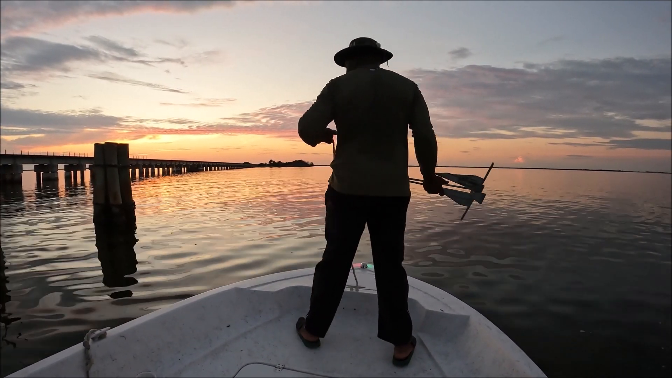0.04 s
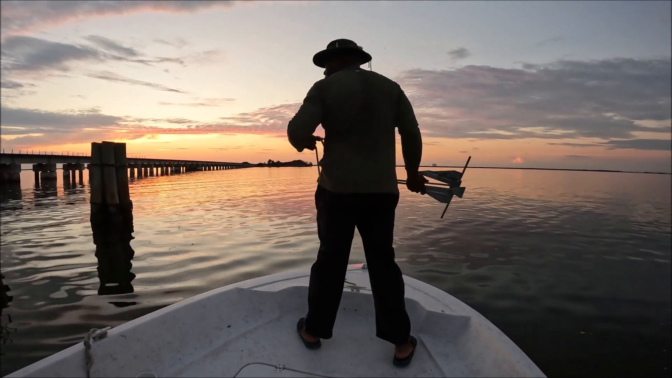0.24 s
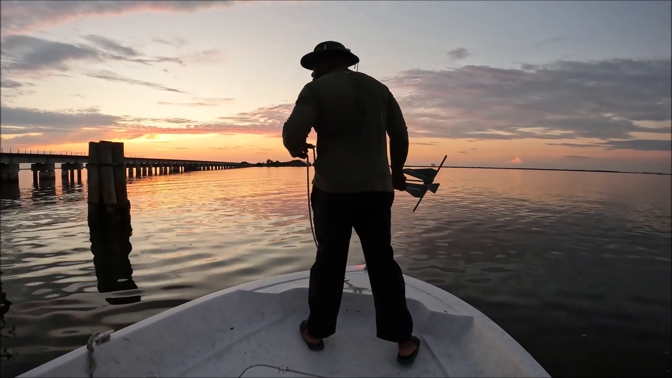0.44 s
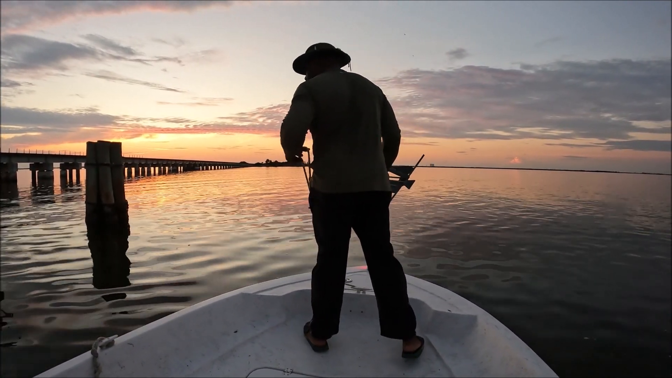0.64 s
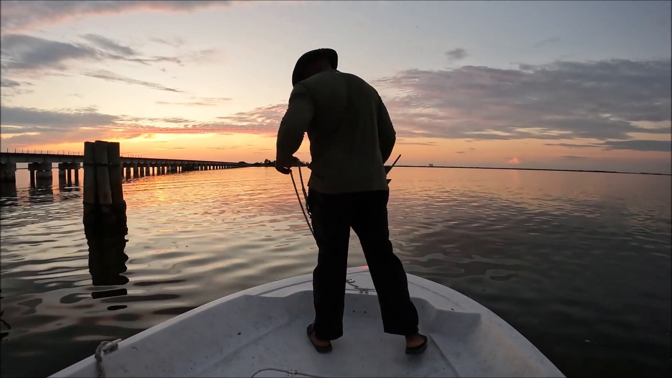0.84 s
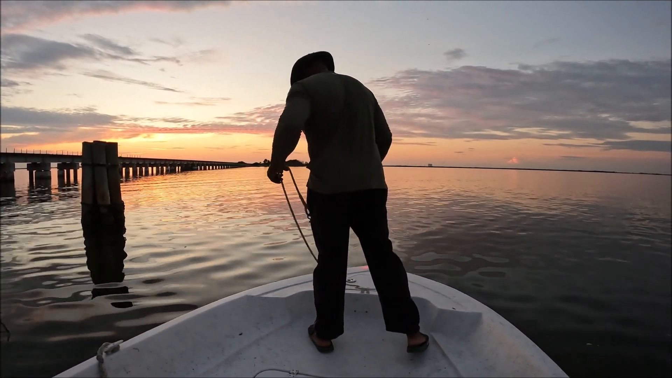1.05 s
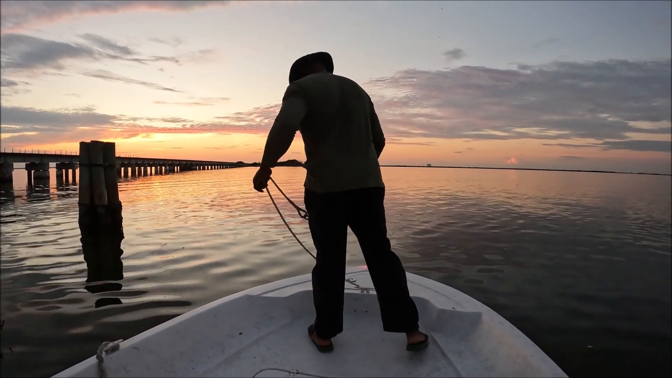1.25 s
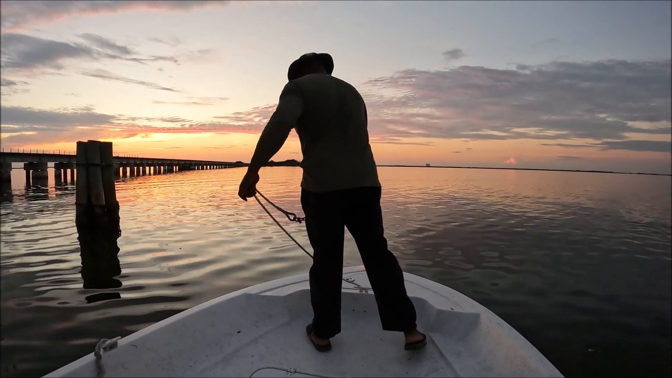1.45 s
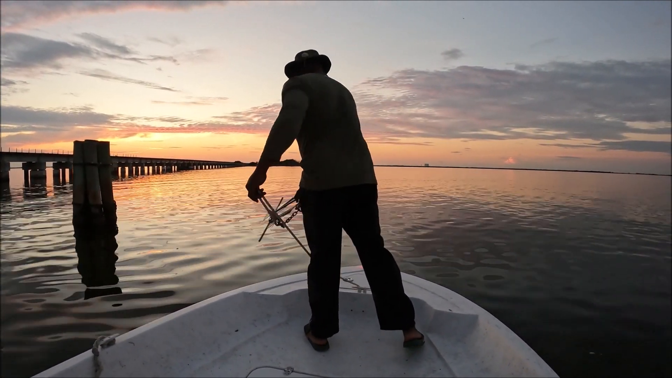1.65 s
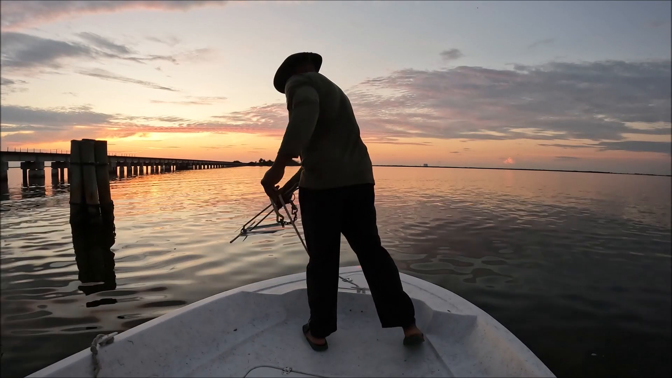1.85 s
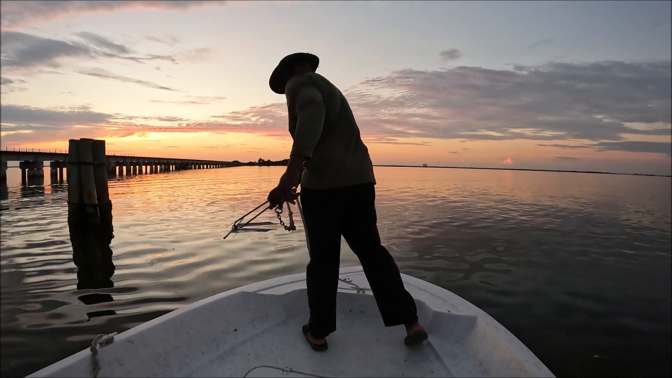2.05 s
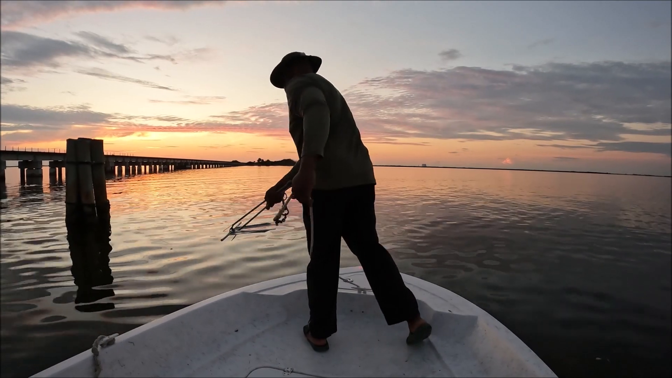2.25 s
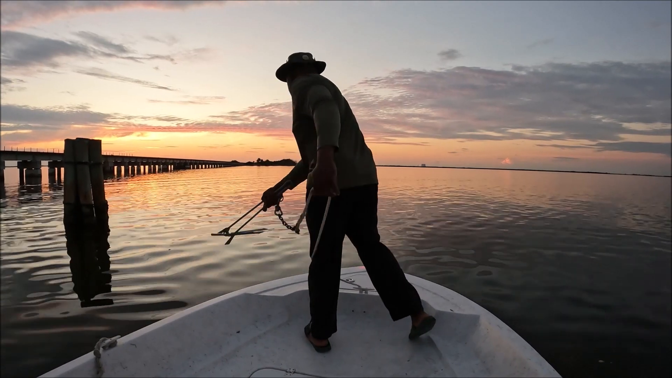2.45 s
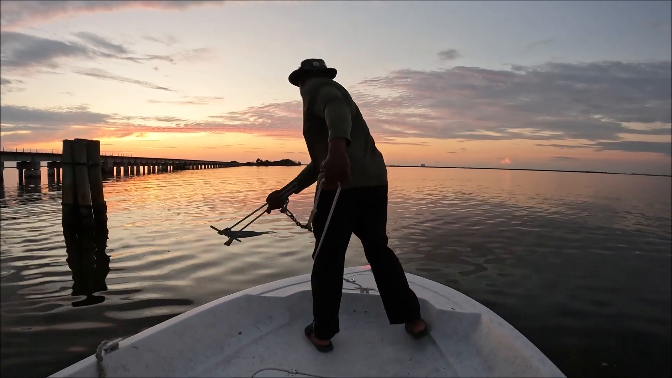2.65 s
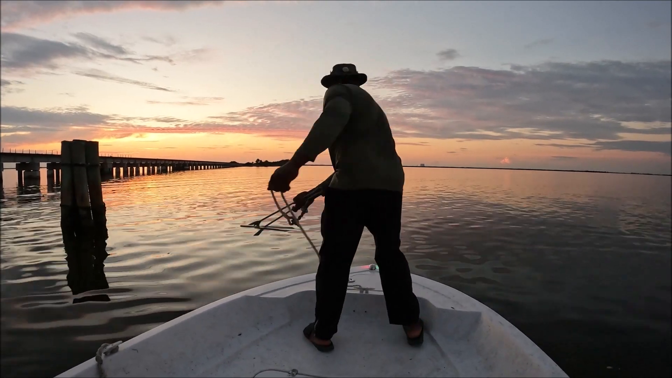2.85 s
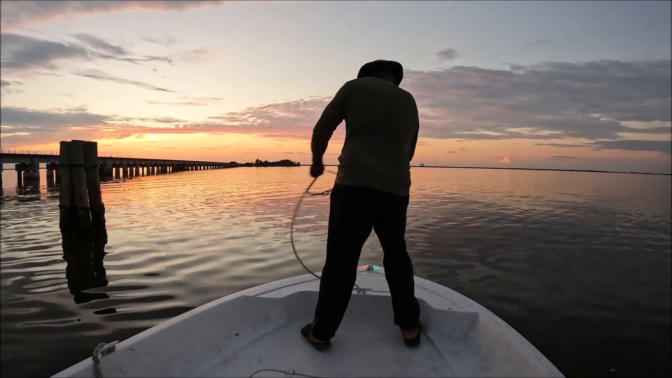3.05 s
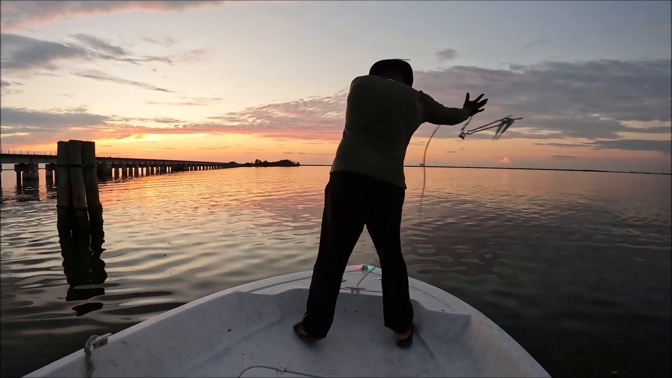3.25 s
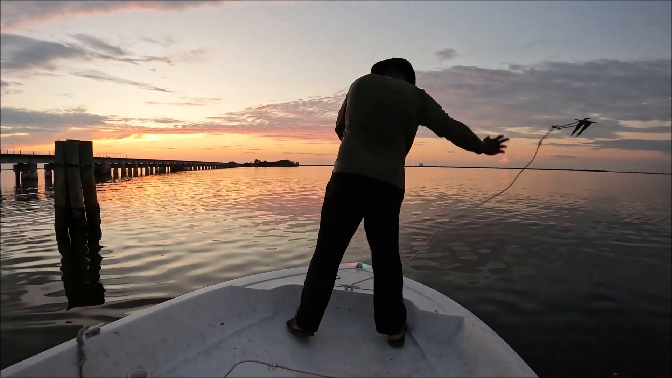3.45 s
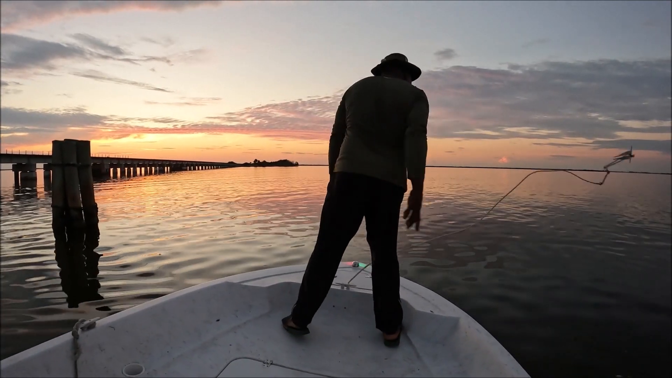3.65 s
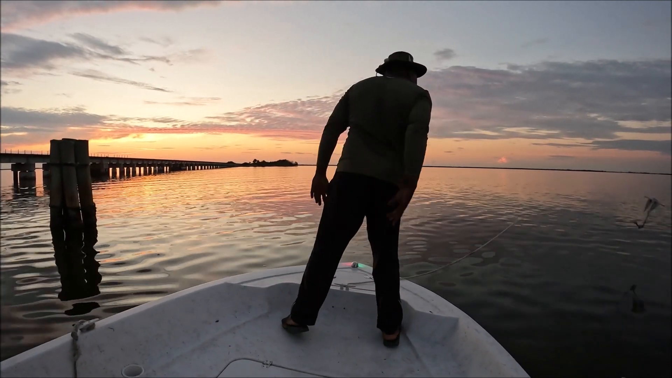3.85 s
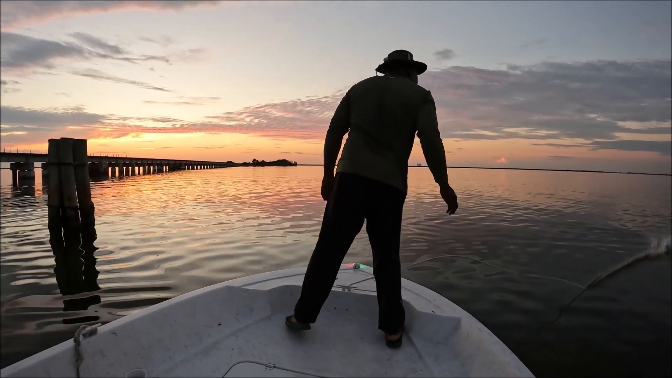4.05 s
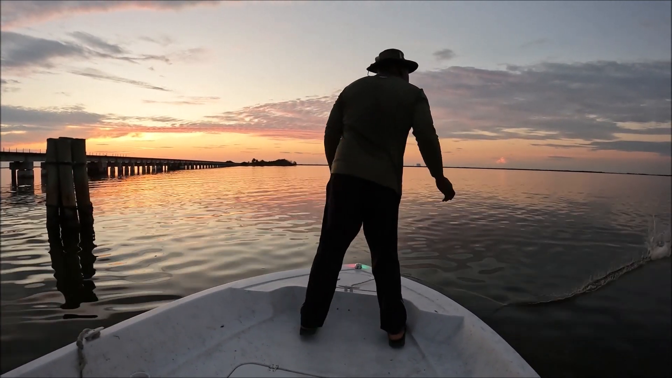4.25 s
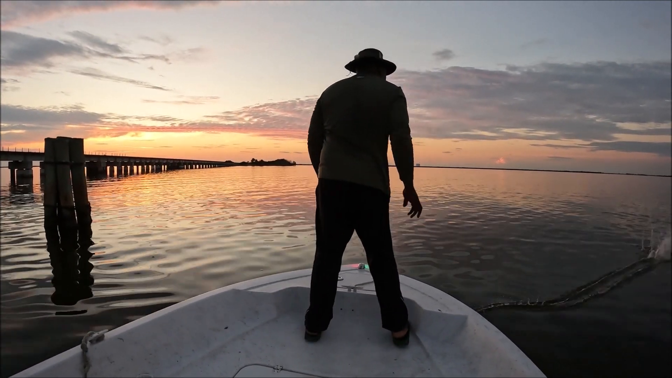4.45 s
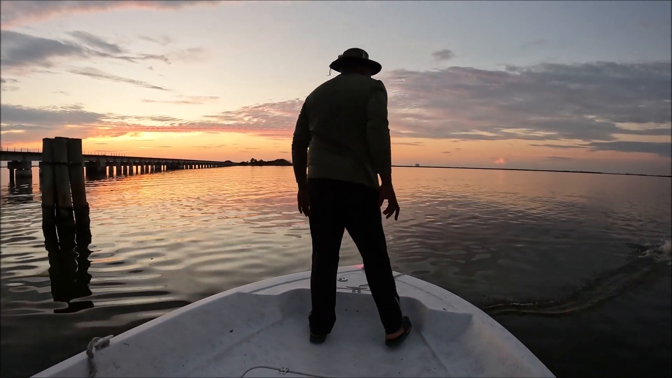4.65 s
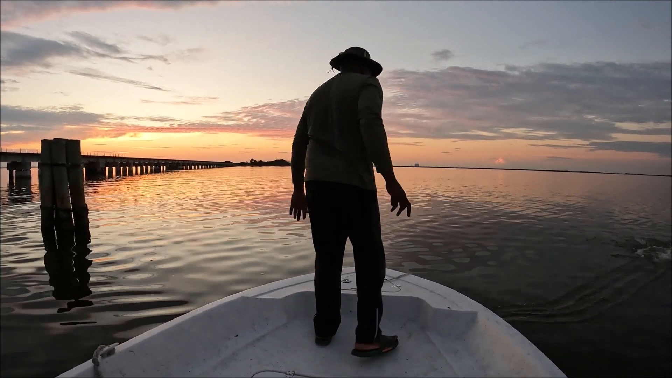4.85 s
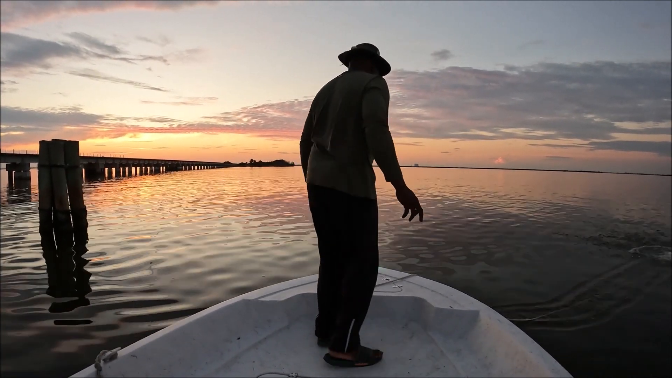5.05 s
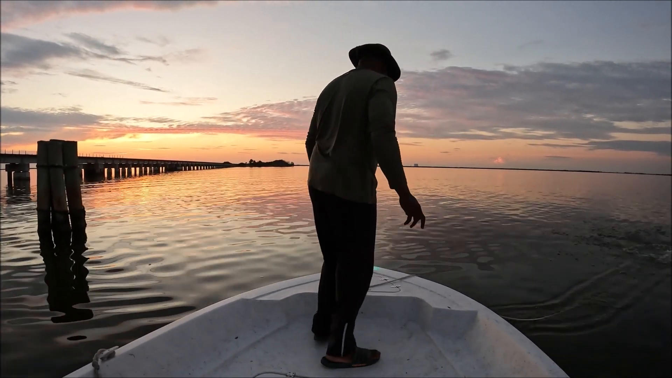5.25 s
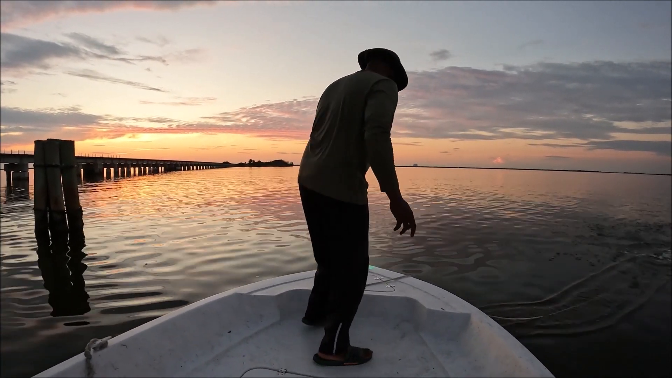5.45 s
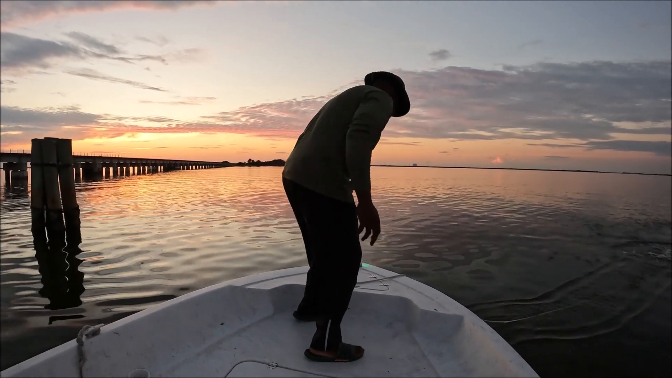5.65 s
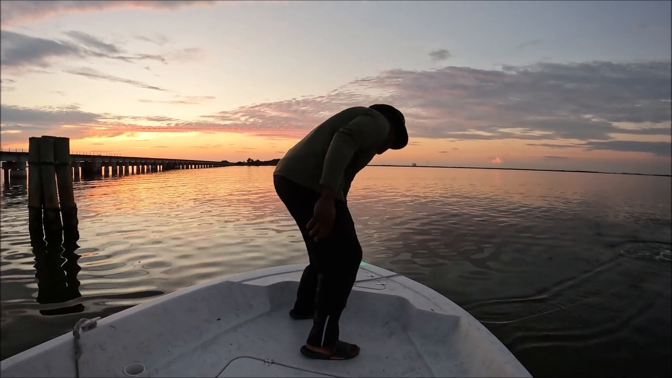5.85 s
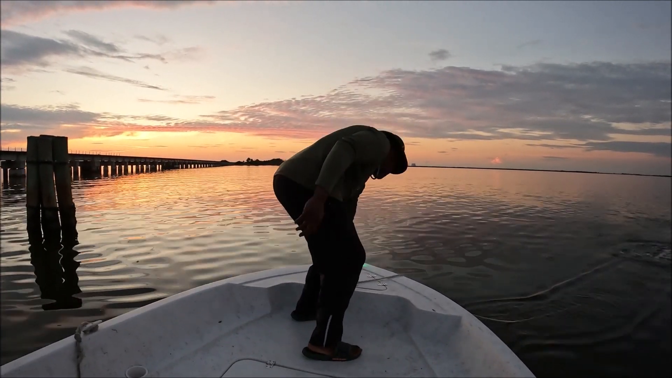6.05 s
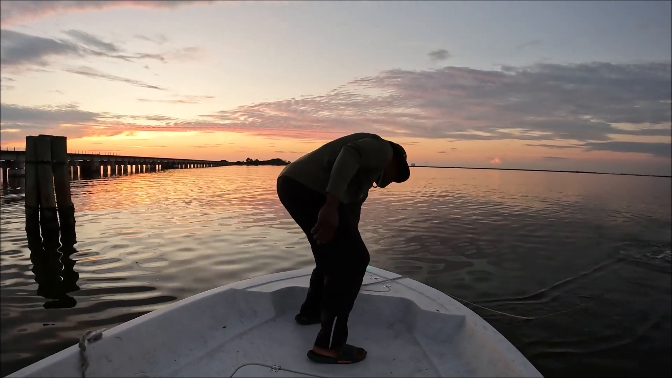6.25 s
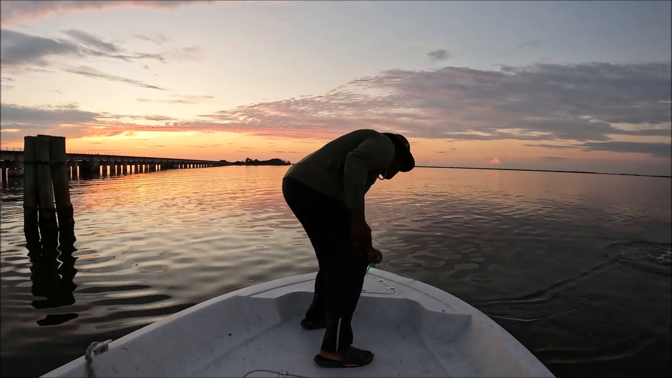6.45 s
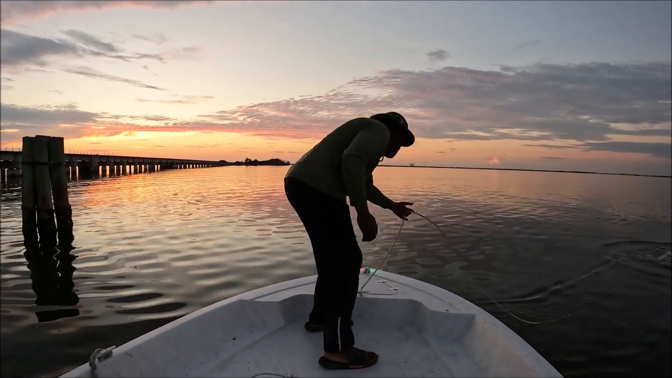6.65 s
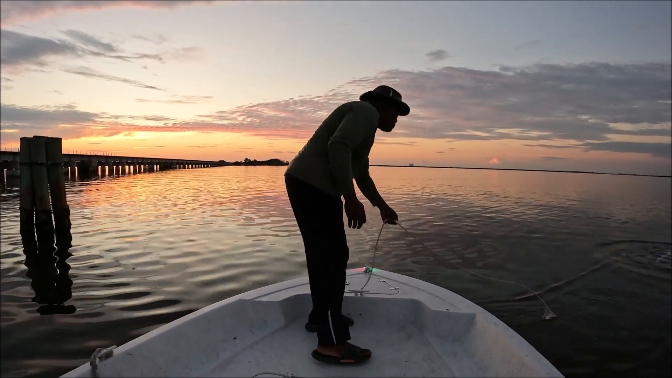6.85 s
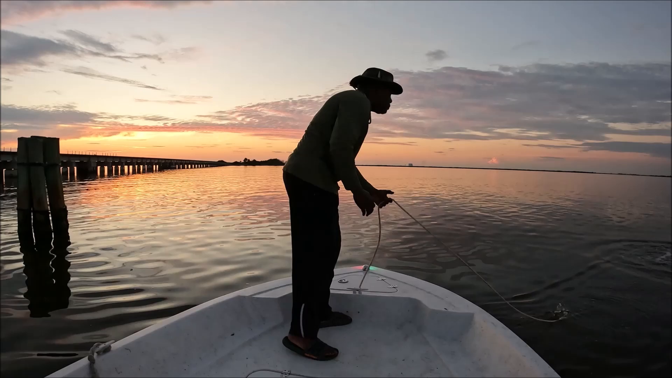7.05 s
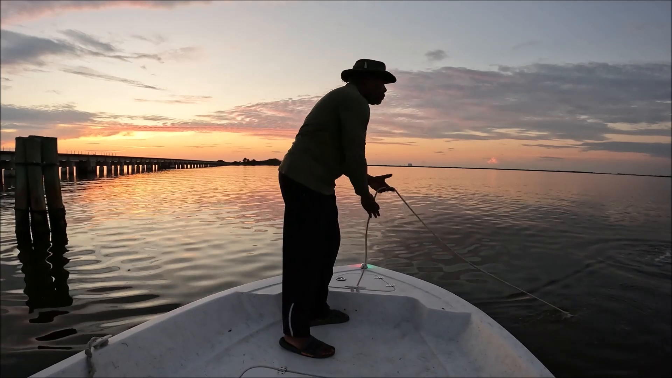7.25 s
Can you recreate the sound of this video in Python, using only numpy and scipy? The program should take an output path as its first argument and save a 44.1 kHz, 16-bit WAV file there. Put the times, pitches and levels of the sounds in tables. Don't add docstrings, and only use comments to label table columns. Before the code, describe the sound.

Throughout, a small boat's idling motor hums low through the hull, over soft rumble and faint wide airy hiss. Dull line ticks open it; at 0.3 and 0.5 seconds a distant crow caws twice, the second lower, with a soft step between. From about 1.8 to 2.2 the iron anchor flukes clank hard against the shank, ringing until choked off by a hand. A few ticks follow, then at 3.2 to 3.5 chain rattles out in a bright, dense burst with hard knocks. Slack line drums hollowly on the hull until 4.4 while the anchor jangles in flight. At 4.2 it plunges with a sharp loud splash, bubbles and churn; spray patters back, thinning by 5.5 with a small slosh. Hollow footsteps thump between 5.1 and 6.7, the strongest near 6.7. From 6.9 to the end at 7.3, the lifted wet line sheds small trickling gushes. Close, dry, outdoor stereo.

```python
import sys
import numpy as np
from scipy import signal
from scipy.fft import rfft, irfft
from scipy.io import wavfile
from scipy.ndimage import uniform_filter1d

SR = 44100
rng = np.random.default_rng(int(sys.argv[2]) if len(sys.argv) > 2 else 0)


def magnitude_from_level(level_db):
    exponent = np.asarray(level_db, float) / 20
    return 10 ** exponent


def int16_out(signal):
    q = np.round(np.clip(np.atleast_2d(signal).T, -1, 1) * 32767)
    wavfile.write(sys.argv[1], SR, q.astype(np.int16))


N = 322371


def rms_one(x):
    return x / np.sqrt(np.mean(x ** 2) + 1e-20)


def in_time(rows):
    s, *columns = np.transpose(rows)
    return [np.interp(np.arange(N) / SR, s, c) for c in columns]


def span(begin_s, end_s, fade_s):
    t = np.arange(N) / SR
    return np.clip(np.minimum(t - begin_s, end_s - t) / fade_s, 0, 1)


def drift(rate):
    r = np.exp(-80 * np.pi * rate / SR)
    slow = signal.lfilter([1], [1, -2 * r, r * r], rng.standard_normal(N // 40 + 2002))[2000:]
    return np.interp(np.arange(N) / 40, np.arange(len(slow)), rms_one(slow))


def coloured(x, spectrum):
    hz, db = np.transpose(spectrum)
    grid = np.maximum(np.fft.rfftfreq(x.shape[-1], 1 / SR), 1)
    gain = magnitude_from_level(np.interp(np.log(grid), np.log(hz), db))
    return rms_one(irfft(rfft(x) * gain, x.shape[-1]))


def band(x, low_hz, high_hz):
    sos = signal.butter(2, [low_hz, min(high_hz, .45 * SR)], "band", fs=SR, output="sos")
    return signal.sosfilt(sos, x)


def resonance(x, hz, width_hz):
    r = np.exp(-np.pi * width_hz / SR)
    poles = [1, -2 * r * np.cos(2 * np.pi * hz / SR), r * r]
    return signal.lfilter(np.array([1, 0, -1]) * (1 - r * r) / 2, poles, x)


def wide(noise, side_db):
    return noise[0] + magnitude_from_level(side_db) * noise[1] * [[1], [-1]]


def add(out, s, sound, pan_db=0):
    i = min(round(s * SR), N - 1)
    out[:, i:i + sound.shape[-1]] += (sound * magnitude_from_level([[pan_db / 2], [-pan_db / 2]]))[:, :N - i]


def decay(t, t60, rise_s):
    return (1 - np.exp(-t / rise_s)) * magnitude_from_level(-60 * t / t60)


# pitch_hz, level_db (per Hz)
HULL_RUMBLE = [(8, -6.5), (15, 2), (24, -4), (38, -18.5), (68, -0.5), (95, -8.5), (200, -20.5), (350, -34),
               (500, -37.5), (700, -46), (4000, -100)]
# time_s, level_db
ROCKING = [(0, -34), (1.5, -35.5), (2.7, -33.5), (3.5, -32), (4.5, -35), (5.6, -32), (7.31, -35)]
# pitch_hz, level_db (per Hz)
FAR_HISS = [(260, -1), (450, -6), (774, -18), (1290, -5.5), (1810, -15), (2860, -17.5), (4310, -24.5),
            (6690, -22.5), (12600, -36.5), (13800, -57)]


def background():
    rocking_db, = in_time(ROCKING)
    low = wide(coloured(rng.standard_normal((2, N)), HULL_RUMBLE), -22)
    far = wide(coloured(rng.standard_normal((2, N)), FAR_HISS), -1.2)
    low_db = rocking_db + 2.5 + 1.22 * drift(9.0)
    far_db = -56 + 2.0 * drift(19.0) + 0.5 * (rocking_db - rocking_db.mean())
    return magnitude_from_level(low_db) * low + magnitude_from_level(far_db) * far


# time_s, firing_rate_hz
IDLE = [(0, 32.14), (4.4, 32.04), (7.31, 32.61)]
# multiple of the firing rate, level_db (rms)
MOTOR_LINES = [(2, -44), (3, -47), (4, -45), (5, -45), (6, -44), (7, -50), (8, -59), (9, -53), (10, -57),
               (11, -57), (12, -68)]
# time_s, level_db
HULL_LOAD = [(0, -5), (1.5, -1), (4.8, 0), (5.8, -8.5), (7.31, -4.5)]


def motor():
    firing_hz = in_time(IDLE)[0] * (1 + .0015 * drift(1.5))
    phase = 2 * np.pi * np.cumsum(firing_hz) / SR
    lines = np.zeros(N)
    for multiple, db in MOTOR_LINES:
        lines += magnitude_from_level(db + 1.5 * drift(2)) * np.sin(multiple * phase + rng.uniform(0, 7))
    return np.sqrt(2) * magnitude_from_level(in_time(HULL_LOAD)[0]) * lines


# pitch_hz, width_hz, level_db
THROAT = [(1510, 330, 7.5), (4360, 280, -12.5), (5670, 1160, -14.5), (6440, 550, -16)]


def caw(rows):
    pitch_hz, level_db, hoarse = in_time(rows)
    cycles = np.cumsum(pitch_hz * (1 + 0.01 * drift(89))) / SR
    breath = hoarse * rng.standard_normal(N) * (cycles % 1 < .5)
    pulses = np.diff(np.floor(cycles), prepend=0) * 9 + breath
    voice = sum(magnitude_from_level(db) * resonance(resonance(pulses, hz, w), hz, 0.93 * w) for hz, w, db in THROAT)
    level = np.sqrt(uniform_filter1d(voice ** 2, size=900) + 1e-9)
    return magnitude_from_level(level_db) * span(rows[0][0], rows[-1][0], 0.0043) * voice / level


# start_s, length_s, top_pitch_hz, level_db
CAWS = [
    (.283, .152, 352, -43),
    (.47, .155, 292, -43.5),
]
# share of length, share of pitch, level_db, hoarseness (0-1)
CAW_ARCH = [(0, .88, -16, .35), (.15, .94, -5.5, .28), (.32, 1.0, 0.0, .15), (.66, .88, -5.5, .4),
            (.8, .83, -8, .75), (1, .82, -16, .95)]


def crow():
    calls = np.zeros(N)
    for s, length_s, hz, db in CAWS:
        calls += caw([(s + u * length_s, share * hz, db + d, hoarse) for u, share, d, hoarse in CAW_ARCH])
    return calls


def cracks(rows, t60, top_hz):
    out, t = np.zeros((2, N)), np.arange(SR // 8) / SR
    for s, db, hz in rows:
        noise = wide(rng.standard_normal((2, len(t))), -7.0)
        centre = rms_one(band(noise, hz / 1.83, hz * 1.38))
        broad = rms_one(band(band(noise, 600, top_hz), 300, top_hz))
        add(out, s, magnitude_from_level(db - 15.0) * (centre + 0.22 * broad) * decay(t, t60, 0.0003), pan_db=-1.5)
    return out


# start_s, peak_db
TICKS = [(0.0014, -28.5), (0.05, -37.5), (0.579, -42), (0.6734, -34), (1.045, -48), (1.266, -35),
         (1.56, -37.5), (2.3984, -43), (2.6644, -42), (2.833, -33.5), (2.855, -28.5), (3.095, -37),
         (6.1783, -41), (6.669, -33.5)]


def line_ticks():
    return cracks([(s, db, 2280) for s, db in TICKS], t60=0.094, top_hz=6100)


def thumps(rows, t60):
    out, t = np.zeros((2, N)), np.arange(SR // 4) / SR
    for s, db, hz, snap_db in rows:
        noise = rng.standard_normal((3, len(t)))
        body = wide(rms_one(band(noise[::2], hz / 1.5, hz * 1.56)), -11)
        ring = np.sin(2 * np.pi * hz * t) + .5 * body
        snap = magnitude_from_level(snap_db - 7.5) * rms_one(band(noise[1], 390, 950)) * magnitude_from_level(-25 * t / t60)
        add(out, s, magnitude_from_level(db - 3.0) * (ring + snap) * decay(t, t60, 0.001))
    return out


# (390-950 Hz, against the ring)
STEPS = [(0.409, -30.5, 195, -9.5), (1.615, -30, 272, -33), (1.677, -31, 186, -28), (1.99, -36, 185, 11.5),
         (5.149, -29.5, 290.5, -1.5), (5.492, -25, 242, 0), (5.584, -29.5, 215, -1.5),
         (5.689, -29.5, 219, -29), (6.202, -26, 201, -5), (6.368, -37.5, 225.4, -1.5),
         (5.66, -22.5, 96, -42), (6.678, -19, 195.5, -27), (7.171, -27.5, 179, -39)]


def footsteps():
    return thumps(STEPS, t60=0.24)


# (390-950 Hz, against the ring)
WHIPS = [(3.249, -21, 218, -38), (3.302, -20.5, 219, -9), (3.53, -23, 186.6, -38), (3.602, -19, 157, -11),
         (3.649, -24, 411, 2.5), (3.696, -10.5, 227, -1.5), (3.747, -17, 232, -13),
         (3.863, -21.5, 227.6, -30), (3.92, -18.5, 224, -15), (3.959, -19.5, 176, -8.5),
         (4.055, -19.5, 257, -11), (4.109, -18, 224, -3.5), (4.188, -20, 236.5, 10.5),
         (4.32, -21.5, 264, -19), (4.362, -15, 234.3, -31), (4.389, -27, 228, 4)]


def line_whips():
    return thumps(WHIPS, t60=0.23)


# time_s, drumming_db
DRAG = [(3.05, -31), (3.4, -38.5), (3.8, -28), (4.0, -36), (4.2, -19), (4.5, -39), (4.7, -32.5)]
# pitch_hz, width_hz, level_db
HULL_PANELS = [(142, 13, 9.5), (221, 24, 3.5), (286.7, 11.2, 10), (332, 14, -8.5)]


def line_drag():
    rub = rng.standard_normal(N) * magnitude_from_level(4.4 * drift(21.0))
    hum = sum(magnitude_from_level(db) * resonance(rub, hz, width) for hz, width, db in HULL_PANELS)
    return magnitude_from_level(in_time(DRAG)[0] - 6.0) * span(DRAG[0][0], DRAG[-1][0], 0.061) * rms_one(hum)


def bubble(out, s, db, hz, rise, t60, pan_db=0):
    t = np.arange(SR // 18) / SR
    tone = np.sin(2 * np.pi * np.cumsum(hz * 2 ** (rise * t)) / SR)
    burst = magnitude_from_level(-12 * (rise * t / 0.8) ** 4)
    add(out, s, magnitude_from_level(db) * tone * decay(t, t60, 0.0013) * burst, pan_db)


def droplets(per_s, size_db):
    size = magnitude_from_level(size_db * np.minimum(rng.exponential(1, (2, N)), 4))
    clicks = size * (rng.random(N) < per_s / SR)
    dealt = rng.integers(0, 12, N)
    pitches_hz = np.geomspace(1800, 13000, 12)
    return rms_one(sum(resonance(clicks * (dealt == k) + 1e-18, hz, hz / 6.7) for k, hz in enumerate(pitches_hz)))


def flicker(noise, together_db, apart_db):
    shared = together_db * drift(22)
    out = 0
    for k, hz in enumerate((600, 1200, 2400, 4800, 9600)):
        out = out + band(noise, hz, 2 * hz) * magnitude_from_level(shared + apart_db * drift(25)) * (-1) ** k
    return out


def swells(rows):
    since = np.arange(N) / SR - np.array(rows)[:, :1]
    db, rise, fall = np.array(rows)[:, 1:4].T[:, :, None]
    return magnitude_from_level(2 * np.maximum(db + np.where(since < 0, rise, -fall) * since, -150))


# pitch_hz, level_db (per Hz)
SPRAY = [(1290, -1.5), (2200, -10.5), (3280, -5.5), (6570, -8), (8400, -18.5), (12600, -20), (14300, -57)]


def water(churn_gain, spray_gain, pitch_hz, begin_s, end_s, count, cycles, size_db):
    swarm = np.zeros((2, N))
    for place, size, octaves, rise, side in np.c_[rng.random((count, 2)), rng.standard_normal((count, 3))]:
        s = begin_s + place * (end_s - begin_s)
        hz = pitch_hz[min(int(s * SR), N - 1)] * 2 ** (0.5 * np.clip(1.315 * octaves, -3.0, 2.5))
        db = -size_db * np.log(size + 0.15) + 2 * octaves
        bubble(swarm, s, db, hz, 6 + 3 * rise, cycles / hz, 4 * side - 1.5)
    inside = span(begin_s, end_s, 0.041)
    swarm = swarm / np.sqrt(np.sum(swarm ** 2) / np.sum(2 * inside))
    churn = swarm + 0.4 * wide(rms_one(band(rng.standard_normal((2, N)), 250, 2860)), -2.3)
    hiss = flicker(rng.standard_normal((2, N)), together_db=1.0, apart_db=1.6)
    spray = coloured(droplets(per_s=900, size_db=7.0) * 0.4 + hiss, SPRAY)
    return inside * (churn_gain * churn + magnitude_from_level(-6.0) * spray_gain * wide(spray, -9.0))


# peak_s, level_db, bubble_pitch_hz
SHEDS = [
    (6.91, -55.5, 2530),
    (6.944, -50.5, 2500),
    (7.03, -54, 1510),
    (7.069, -50, 1230),
    (7.105, -50, 1530),
    (7.136, -42, 1380),
    (7.18, -51, 1940),
    (7.208, -42.5, 1830),
    (7.27, -49, 1300),
]


def trickle():
    rise_db_s, fall_db_s = 348, 548
    power = swells([(s, db, rise_db_s, fall_db_s) for s, db, hz in SHEDS])
    gush = np.sqrt(power.sum(0))
    pitch_hz = np.array(SHEDS)[:, 2] @ power / power.sum(0)
    return water(gush, gush * magnitude_from_level(3), pitch_hz, 6.86, 7.33, count=420, cycles=28.0, size_db=11.0)


# start_s, peak_db, pitch_hz, rise_octaves_per_s
DROPS = [(4.201, -15, 1480, 4), (4.217, -14, 560, 4), (4.231, -18, 930, 6), (4.258, -25, 2450, 8),
         (4.325, -22, 620, 30), (4.388, -14, 450, 110), (4.44, -30, 660, 3), (4.468, -29, 650, 3),
         (4.565, -31, 1000, 25), (4.64, -32, 1450, 4), (4.772, -32, 650, 5), (4.89, -31, 900, 8),
         (4.975, -32, 900, 5), (5.03, -32, 860, 5), (5.59, -32, 690, 30), (5.609, -36, 1050, 30),
         (7.036, -28, 1600, 120), (7.096, -30, 3800, 78), (7.111, -29, 1260, 19), (7.124, -28, 960, 15),
         (7.253, -32, 3350, 36), (7.263, -35, 4300, 25), (7.268, -37, 1200, 20)]


def drops():
    out = np.zeros((2, N))
    for s, db, hz, rise in DROPS:
        bubble(out, s, db, hz, rise, min(0.04 * 1000 / hz, .07))
    return out


# start_s, peak_db, centre_hz
SPITS = [(4.2587, -40, 3230), (4.3094, -18, 5900), (4.4694, -24, 2540), (4.549, -23, 2710),
         (4.628, -26, 2700), (4.7194, -36, 2680), (4.8, -25, 3910), (4.8776, -20, 3810),
         (4.8944, -20, 2800), (4.9544, -36, 3240), (4.979, -23, 3080), (5.006, -20, 4420),
         (5.0933, -23, 2820), (5.1644, -25, 3390), (5.1894, -37, 3240), (5.2124, -25, 4180),
         (5.2274, -42, 5120), (5.3734, -33, 2640), (5.5644, -54, 2600), (5.6276, -44, 2870),
         (7.0214, -38, 3030), (7.063, -32, 2910), (7.0968, -27, 4190), (7.1144, -44, 3430),
         (7.1314, -32, 3420), (7.17, -25, 3370), (7.2194, -25, 2610), (7.2894, -34, 2800)]


def water_spits():
    return cracks(SPITS, t60=0.023, top_hz=9040)


# start_s, peak_db, centre_hz
SLAPS = [(0.8818, -37.5, 6100), (4.1775, -9, 2000), (4.189, -1, 1800),  (4.294, -17.5, 5100),
         (4.343, -35, 5000), (4.3949, -19.5, 3140), (4.701, -15.5, 3500), (4.782, -17, 1440),
         (4.8404, -22, 2650), (5.146, -27, 2330), (5.2998, -27, 2860), (5.3273, -28.5, 7700),
         (5.3555, -24.5, 2640), (5.4, -31, 3620), (5.459, -33, 8400), (5.479, -32, 2500),
         (5.494, -21.5, 1400), (5.517, -31, 3930), (7.205, -34, 2510)]


def water_slaps():
    return cracks(SLAPS, t60=0.07, top_hz=9100)


# peak_s, level_db, rise_db_per_s, fall_db_per_s, bubble_pitch_hz
CHURN = [
    (4.1, -39.5, 55, 42, 1250),
    (4.198, -27, 451, 149, 977),
    (4.265, -33.5, 93, 104, 803),
    (4.39, -39, 66, 28.5, 585),
    (4.76, -37, 31.5, 26.5, 1545),
    (5.495, -44.5, 248, 128, 840),
    (5.588, -47.5, 702, 163, 470),
]
# peak_s, level_db, rise_db_per_s, fall_db_per_s
MIST = [
    (4.165, -33, 81, 498),
    (4.27, -42, 250, 5),
    (4.92, -42, 21, 31),
    (5.4, -50.5, 23, 49),
]


def splash():
    power = swells(CHURN)
    pitch_hz = np.array(CHURN)[:, 4] @ power / power.sum(0)
    rain_ends = magnitude_from_level(np.clip((5.4 - np.arange(N) / SR) * 90, -12, 0))
    rain = np.sqrt(swells(MIST).sum(0)) * rain_ends
    return water(np.sqrt(power.sum(0)), rain, pitch_hz, 4.07, 5.9, count=1200, cycles=20.0, size_db=1.0)


# start_s, peak_db, centre_hz
KNOCKS = [(1.7755, -11.5, 3300), (1.781, -11, 4500), (2.0715, -19, 6560), (2.222, -33, 8000),
          (3.1422, -19.5, 2560), (3.3243, -1, 5130), (3.4655, -20, 7000), (3.5402, -19, 7500),
          (3.6065, -18, 6500), (3.651, -7, 1500), (3.6965, -5, 940), (3.703, -13, 800), (3.7465, -14, 1390),
          (3.882, -19, 2100), (3.893, -27, 2000), (5.692, -26.5, 2300), (5.692, -31, 1000),
          (5.774, -28, 1790), (5.774, -29, 900)]


def hard_knocks():
    return cracks(KNOCKS, t60=0.033, top_hz=7000)


def lumps(count, depth_db):
    steps = rng.standard_normal(count // 260 + 2)
    return magnitude_from_level(depth_db * np.interp(np.arange(count) / 260, np.arange(len(steps)), steps))


def minor_modes(level_db):
    modes = []
    for hz, u in rng.uniform([1800, 0], [13500, 1], (150, 2)):
        db = level_db - 6 * np.log2(hz / 4000) ** 2 - 24 * u
        modes.append((hz, db, (0.068 + 0.63 * u) * min(5000 / hz, 1)))
    return modes


# pitch_hz, level_db (per Hz)
CRACK = [(1350, -9), (2300, 1.5), (3990, -9.5), (4530, -3.5), (7500, -5.5), (10100, -19), (12800, -21),
         (14600, -52.5)]


def contact_crack(t, deep_db, favoured_hz, crack_t60):
    noise = rng.standard_normal((2, 2, len(t)))
    touches = np.repeat(np.minimum(rng.exponential(1, len(t) // 70), 2.5), 70)
    chatter = magnitude_from_level(3.5 * touches - 4)
    bright = coloured(wide(noise[0], -10), CRACK)
    top = band(bright, 7600, 23000)
    bright += top * (magnitude_from_level(-35 * t / crack_t60) * .85 - 1)
    bright += 0.79 * rms_one(band(wide(noise[0], -5), favoured_hz / 1.45, favoured_hz * 1.62))
    deep = band(band(chatter * wide(noise[1], -1.6), 480, 5400), 600, 6300)
    return band(chatter * bright, 2030, 18000) + magnitude_from_level(deep_db) * rms_one(deep)


def metal(hits, modes, ring_db, spread_db, damping, minor_db):
    out, t = np.zeros((2, N)), np.arange(SR // 3) / SR
    all_modes = np.array(list(modes) + minor_modes(minor_db))
    hush_s, hush_db_s = 2.24, 250
    for s, db, deep_db, favoured_hz, favoured_t60 in hits:
        lighter_db = -19.5 - db
        crack_t60 = min(0.16 * magnitude_from_level(0.87 * lighter_db), 0.07)
        crack = contact_crack(t, deep_db, favoured_hz, crack_t60)
        hz, mode_db, t60 = all_modes.T[:, :, None]
        chance_db = spread_db * np.minimum(hz / 3000, 1) * rng.standard_normal(hz.shape)
        strength = magnitude_from_level(mode_db + deep_db * (hz < 2300) + chance_db)
        t60 = np.minimum(t60, damping / np.sqrt(hz))
        hz = hz * (1 + hz / 6500000.0 * rng.standard_normal(hz.shape))
        hush = magnitude_from_level(-hush_db_s * np.maximum(s + t - hush_s, 0) * (s < hush_s))
        tones = np.sin(2 * np.pi * hz * t + rng.uniform(0, 6.8, hz.shape))
        rings = strength * hush * magnitude_from_level(-60 * t / t60) * tones
        sides = magnitude_from_level(2.2 * rng.standard_normal((2, len(hz))))
        favoured = magnitude_from_level(3.5 - 60 * t / favoured_t60) * np.sin(2 * np.pi * favoured_hz * t)
        ringing = sides[:, ::2] @ rings[::2] * lumps(len(t), 4.0)
        ringing += sides[:, 1::2] @ rings[1::2] * lumps(len(t), 4.0)
        ringing += favoured * lumps(len(t), 3.0)
        ringing *= magnitude_from_level(ring_db + 0.0253 * lighter_db) * decay(t, 8.3, 0.002)
        add(out, s, magnitude_from_level(db) * (magnitude_from_level(-9.0) * crack * decay(t, crack_t60, 0.0061) + ringing))
    return out


# start_s, peak_db, deep_db, favoured_hz, favoured_t60_s
LINKS = [(3.2221, -23, -7, 1860, 0.031), (3.2575, -39.5, 0, 6440, 0.044), (3.29, -38, 9, 2536, 0.16),
         (3.3059, -18, -9, 1760, 0.054), (3.315, -13.5, -11, 4900, 0.044),
         (3.3243, -8.5, -18.5, 5443, 0.092), (3.331, -9, -18, 4086, 0.076), (3.327, -19.5, -31, 9702, 0.18),
         (3.3395, -13.5, -27, 6266, 0.057), (3.3494, -8.5, -3.5, 7500, 0.079), (3.359, -10, -1, 4301, 0.1),
         (3.3705, -12.5, -14, 4086, 0.096), (3.381, -14.5, -5.5, 6740, 0.048), (3.39, -25, -1, 6395, .06),
         (3.402, -25, 6, 4748, 0.04), (3.4149, -18, -21, 7400, 0.056), (3.43, -22.5, -21, 6700, 0.046),
         (3.466, -25, -27, 7000, 0.072), (3.479, -31.5, -27, 6550, 0.2), (3.535, -29.5, -15, 7500, 0.038),
         (3.541, -31, -7, 7550, 0.11), (3.5877, -22.5, 1.5, 7270, 0.085), (3.6044, -20, -9, 2110, 0.05),
         (3.6361, -33.5, 8, 4100, 0.39), (3.666, -32.5, 6, 5320, .25), (3.756, -40, -5, 2536, 0.66),
         (3.762, -35, -20, 4800, 0.097), (3.7944, -30, -26, 5100, 0.068), (3.805, -35, -20, 7060, 0.19),
         (3.82, -43, 9, 6800, .2), (3.858, -39, 13, 2440, .04)]
# pitch_hz, level_db, t60_s
CHAIN = [(2164, -7.5, 0.15), (2536, -22, .4), (3190, -42.5, 0.15), (4086, -14, 0.15), (4301, -28, 0.15),
         (4748, -14, 0.17), (5443, -8.5, 0.083), (6266, -19.5, .2), (6740, -8.5, .15), (7429, -15, 0.17),
         (7670, -17, .2), (9702, -18, 0.12), (5920, -15, 0.069), (3725, -11, 0.13)]


def chain_rattle():
    return metal(LINKS, CHAIN, ring_db=-12.5, spread_db=4.5, damping=14.0, minor_db=-14.5)


# start_s, peak_db, deep_db, favoured_hz, favoured_t60_s
JANGLE = [(3.8814, -24.5, 0, 1910, 0.11), (3.902, -31.5, 12, 2110, 0.14), (3.915, -39, 0, 5330, .04),
          (3.968, -27, -7, 4830, .04), (4.015, -35.5, 9, 3300, .04), (4.07, -36, 13, 1310, .04),
          (3.93, -32.5, 12, 3741, 0.32), (3.9512, -26.5, 6.5, 7300, 0.089), (3.9838, -33.5, 7, 1685, .6),
          (4.044, -38, 11.5, 2110, .3), (4.0986, -22.5, 8, 1675, 0.13), (4.1138, -24.5, -15, 2700, .2),
          (4.1379, -22, -7, 3870, 0.086)]
# pitch_hz, level_db, t60_s
FREE_FLUKES = [(1774, -30, .9), (2110, -17, 0.35), (2500, -10, 0.31), (2800, -16, .4), (3741, -15, .45),
               (4260, -21, 0.3), (5350, -15, 0.29), (5660, -30, .3), (6700, -13, 0.2), (7300, -18, 0.17),
               (4700, -22, .25), (3300, -17, 0.3)]


def anchor_jangle():
    return metal(JANGLE, FREE_FLUKES, ring_db=-12.0, spread_db=5.0, damping=19.0, minor_db=-16.0)


# start_s, peak_db, deep_db, favoured_hz, favoured_t60_s
CLANKS = [(1.788, -18.5, -26, 6400, 0.057), (1.793, -13.5, -10.5, 2500, 0.11),
          (1.797, -20.5, -14, 2157, 0.23), (1.803, -35, -24, 2800, 0.25), (1.851, -13.5, -5.5, 4500, 0.08),
          (1.863, -21.5, 7, 4500, 0.2), (1.992, -8.5, 0.5, 2330, 0.054), (2.004, -15, 4.5, 2180, 0.083),
          (2.024, -17.5, -14, 1790, 0.19), (2.039, -26.5, 9, 2470, 0.37), (2.13, -13.5, -0.5, 1810, 0.1),
          (2.169, -25.5, 7.5, 1900, 0.12), (2.2, -48, 12, 2800, 1)]
# pitch_hz, level_db, t60_s
FLUKES = [(948, -6, 0.17), (1042, -10.5, 0.2), (1058, -3, 0.33), (1715, -10, 0.18), (1830, -11.5, 0.14),
          (2090, -1, 0.055), (2500, -16, 0.24), (2670, -21.5, 0.62), (3227, -18.5, 0.4), (3320, -27, .3),
          (4330, -12, 0.043), (5400, -23, 0.15), (6400, -31, 0.23), (6960, -14, 0.18), (7400, -7, 0.058)]


def anchor_clank():
    return metal(CLANKS, FLUKES, ring_db=-13.0, spread_db=3.5, damping=40.0, minor_db=-14.5)


def scene():
    setting = background() + motor() + crow()
    hull = line_ticks() + footsteps() + line_whips() + line_drag()
    wet = trickle() + drops() + water_spits() + water_slaps() + splash()
    iron = hard_knocks() + chain_rattle() + anchor_jangle() + anchor_clank()
    return setting + hull + wet + iron


def roll_off(x):
    return signal.sosfilt(signal.butter(12, 15710, fs=SR, output="sos"), x)


def record(dry):
    cycles = np.fft.rfftfreq(N)
    lag = np.exp(-2j * np.pi * cycles * .6)
    lift = magnitude_from_level(2.8 * (cycles / 0.27) ** 4)
    left = irfft(rfft(dry[0]) * lag * lift, N)
    top_cut = signal.cheby2(12, 60, 15750, fs=SR, output="sos")
    ports = signal.sosfilt(top_cut, [left, dry[1]])
    ports = .7 * np.tanh(ports / .7)
    return roll_off(ports)


dry = scene()
out = record(dry)
int16_out(out)
```